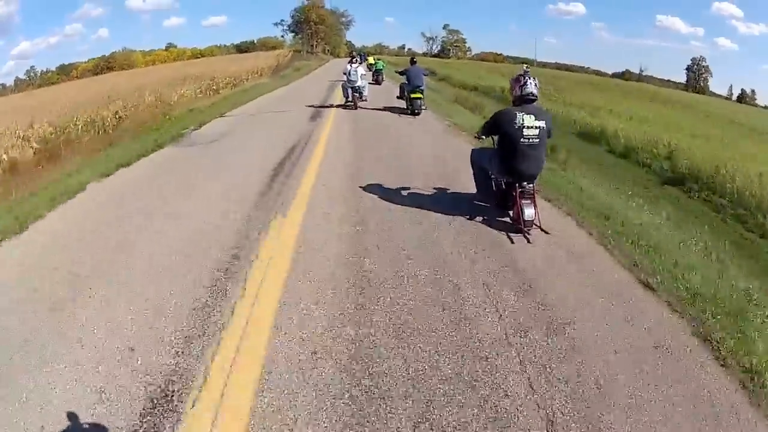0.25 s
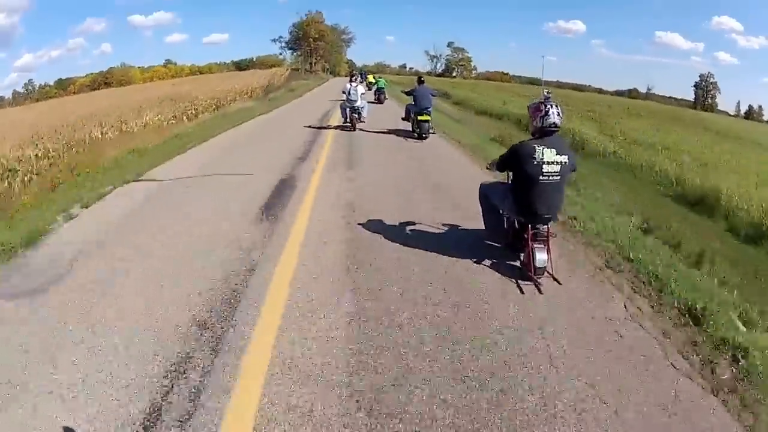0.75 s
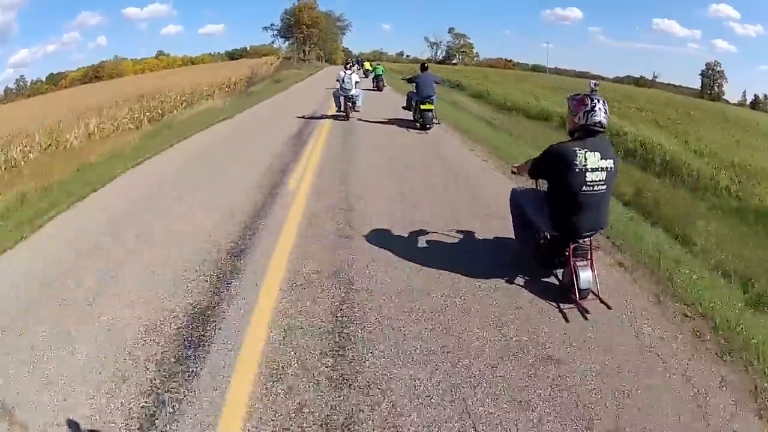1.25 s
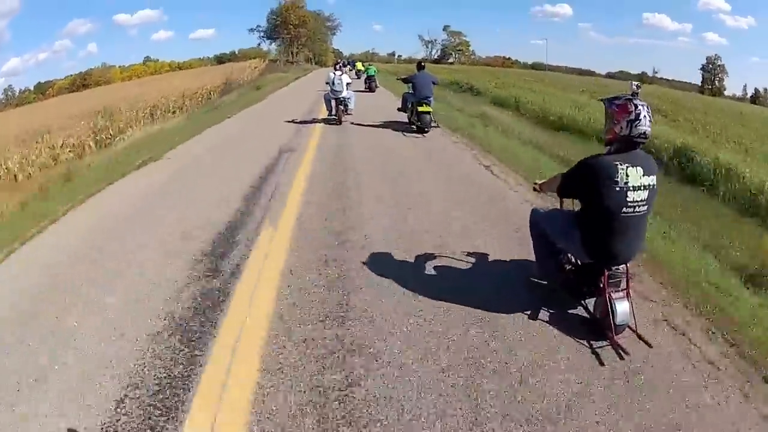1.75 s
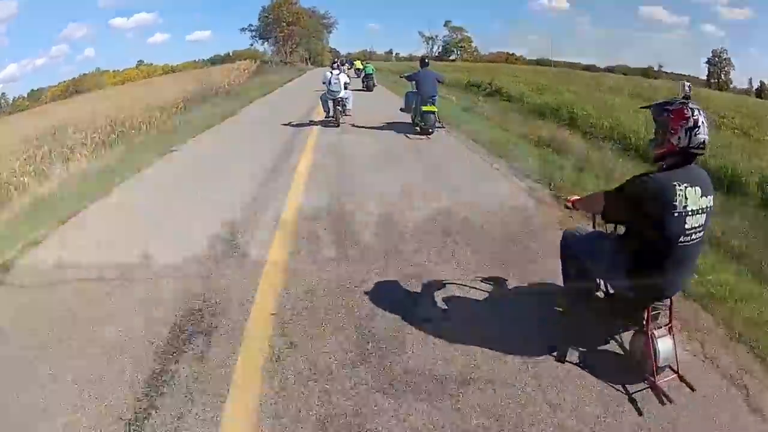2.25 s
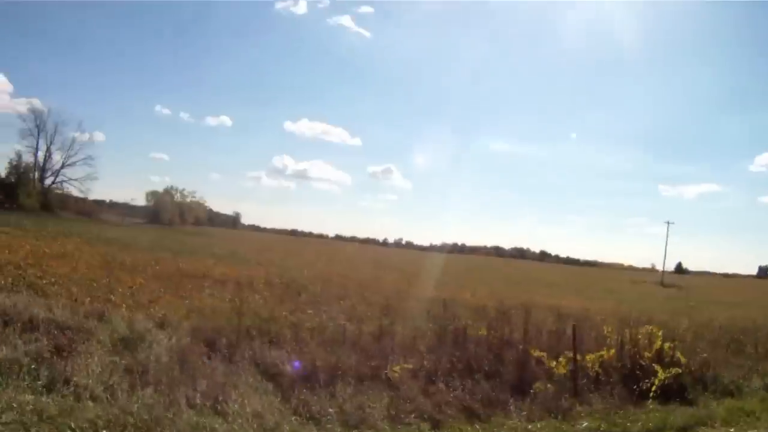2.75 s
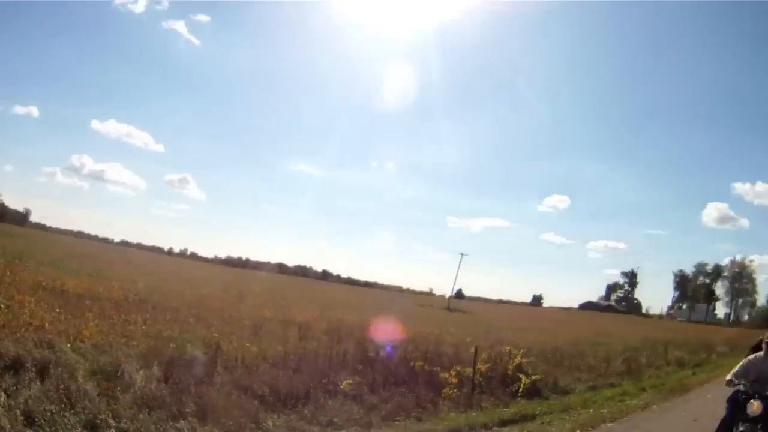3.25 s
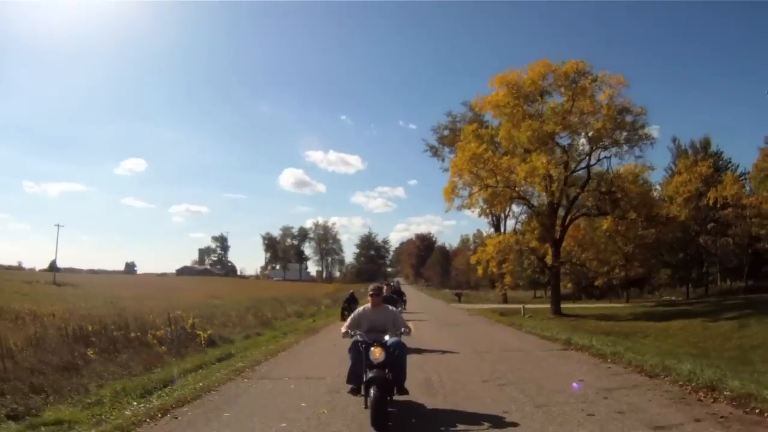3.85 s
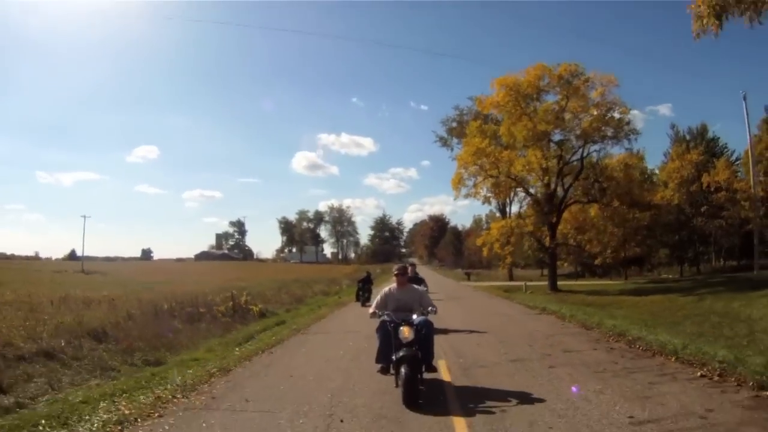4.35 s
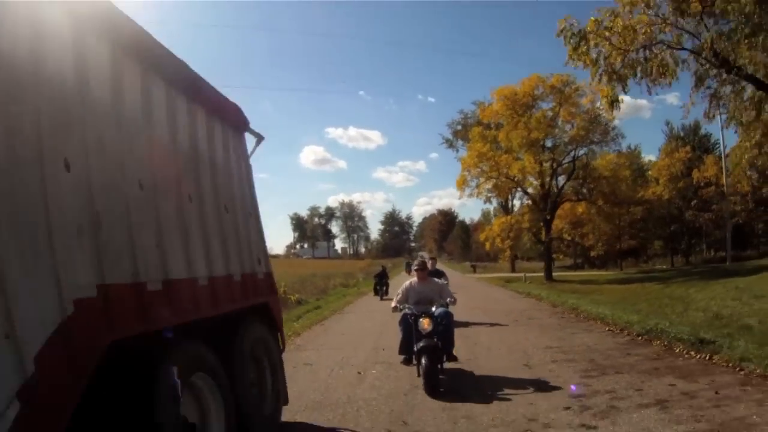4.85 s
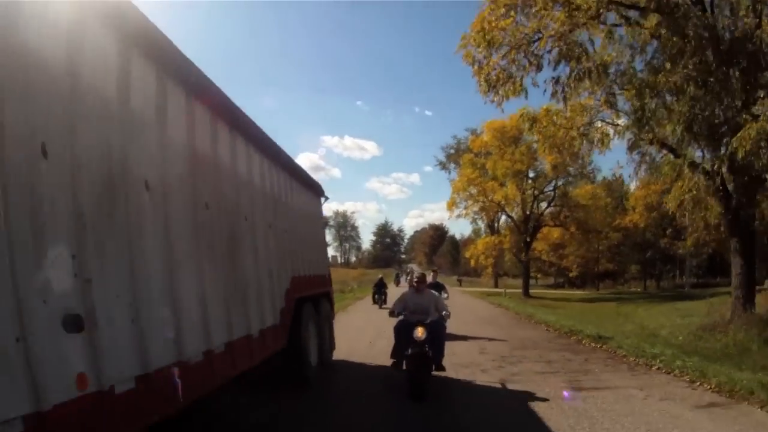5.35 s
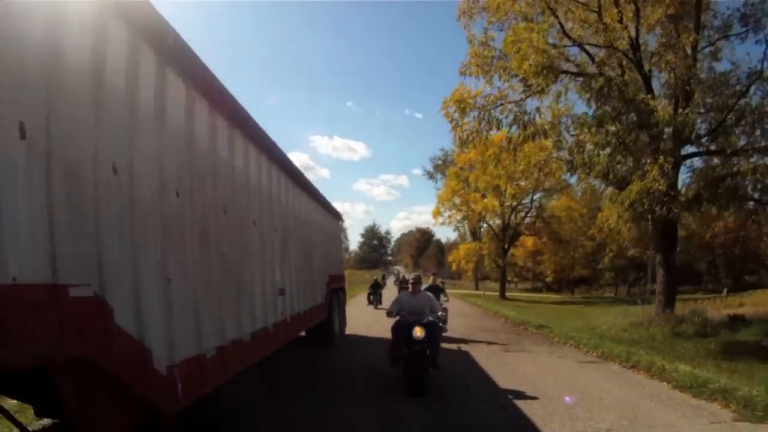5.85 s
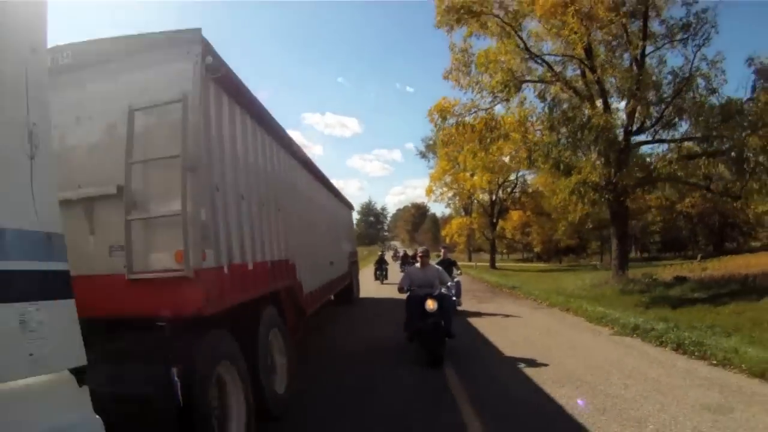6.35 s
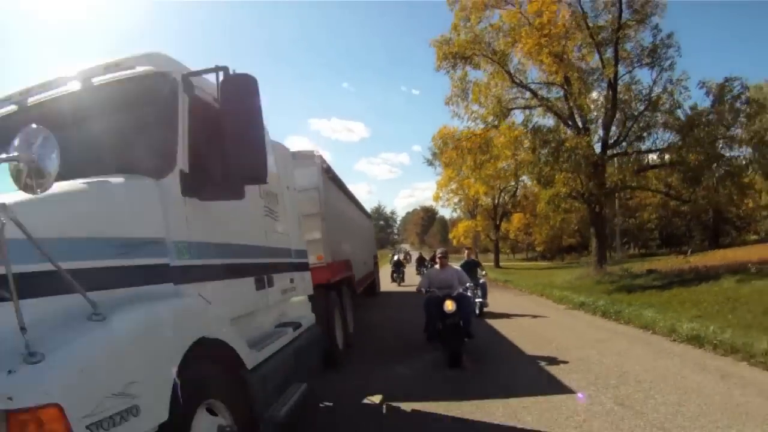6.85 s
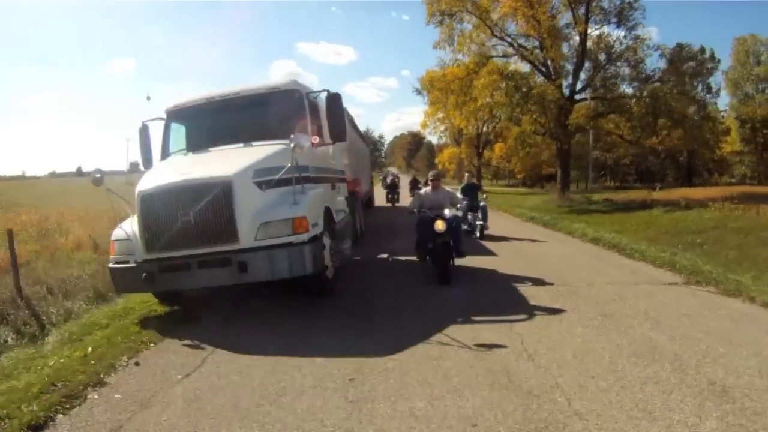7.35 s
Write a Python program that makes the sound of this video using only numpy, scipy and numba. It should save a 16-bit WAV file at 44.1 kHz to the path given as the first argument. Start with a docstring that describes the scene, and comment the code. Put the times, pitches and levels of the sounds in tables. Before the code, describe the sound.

Small motorbikes ride in a pack with pulsing exhausts, dull knocks, metal clacks and wind, and a lorry rushes past.

```python
"""A country road, heard from a camera on one of a pack of small four-stroke minibikes.
A loud bike runs just ahead, a second beside it, each firing an exhaust pulse coloured by its pipe.
That ride dissolves into a second: the camera's own bike thuds, rattles and rings its frame amid the pack.
Loose metal clacks, wind and tyres roar, a lorry passes. Bumps knock the mount and duck the gain control;
a sample-and-hold mirrors the treble."""
import sys
import numpy as np
from scipy import signal
from scipy.fft import rfft, irfft
from scipy.io import wavfile
from scipy.ndimage import uniform_filter1d
from numba import njit

SR = 44100
rng = np.random.default_rng(int(sys.argv[2]) if len(sys.argv) > 2 else 0)


def master(y):
    """Save y as 16-bit WAV."""
    cut = np.clip(np.atleast_2d(y).T, -1, 1)
    pcm = np.round(cut * 32767)  # scale
    wavfile.write(sys.argv[1], SR, pcm.astype(np.int16))


N = 334719
T = np.arange(N) / SR
DISSOLVE_S = (2.19, 2.63)


# lead engine speed (time [s], firing rate [Hz])
LEAD_RATE = [(0.0, 29.97), (0.64, 30.1), (1.07, 29.16), (1.21, 29.32), (2.21, 27.33), (2.33, 26.52),
             (2.61, 26.34)]
# lead bike level and pipe echo (time [s], level [dB], echo [share of pulse])
LEAD_LEVEL_ECHO = [(0, -3, 0.46), (.95, -9, 0.67), (1.45, -7.5, 0.089), (2.2, -9.5, 0.16)]
# exhaust response, lead and second bike (frequency [Hz], gain [dB])
LEAD_EXHAUST = [(30, -48), (80, -18), (130, -5), (190, -3), (240, 1), (290, -13.5), (360, -11),
                (440, -29.5), (600, -20.5), (790, -22.5), (900, -46.5), (1300, -46.5)]

def lead_bike():
    """Exhaust pulses echo from the pipe end; gas churns after each, the intake gulps between them."""
    times = firings(LEAD_RATE)
    bangs = pulses(np.abs(times - .0012), scatter_db=1, jitter_s=.0001)
    echo = curve(LEAD_LEVEL_ECHO, column=2) * later(bangs, .00576)
    exhaust = unit(colour(bangs + echo, LEAD_EXHAUST))
    gulps = pulses(times + .018, scatter_db=2.5, jitter_s=.0002)
    intake = undb(-12.5) * unit(ring(gulps, [(290, 25, 3), (365, 17, -3.5)]))
    flow = bangs + .87 * gulps + .16 * bursts(bangs, .019)
    silencer = undb(-18) * unit(ring(flow, [(767, 33, 19), (720, 34, 10), (519, 120, -12.5)]))
    gas = undb(-17) * unit(colour(bursts(bangs, .012), LEAD_EXHAUST))
    taps = pulses(times - .008, scatter_db=.5, jitter_s=.0024)
    valves = undb(-28.5) * unit(colour(bursts(taps, .017, rise_s=.0012), METAL_SPECTRUM))
    return undb(curve(LEAD_LEVEL_ECHO)) * (exhaust + intake + silencer + gas + valves)


# own engine speed (time [s], firing rate [Hz])
OWN_RATE = [(2.283, 22.5), (2.59, 20.62), (3.2, 22.14), (3.45, 21.77), (4.07, 22.96), (4.35, 24.03),
            (4.96, 24.23), (5.2, 24.87), (5.77, 23.55), (6.14, 24.9), (6.48, 23.73), (6.98, 24.47),
            (7.32, 27.18), (7.61, 27.4)]
# own exhaust response (frequency [Hz], gain [dB])
OWN_EXHAUST = [(30, -31), (80, -7.5), (150, 6), (220, -5), (290, -1), (380, 1.5), (500, 2.5), (590, -1),
               (720, -36.5), (950, -49.5)]
# frame and camera mount modes (frequency [Hz], width [Hz], gain [dB])
FRAME_MODES = [(392.4, 16.7, 1), (286, 46, -20), (1137, 96, -25), (2395, 10.5, -18)]
# rattle of loose parts (frequency [Hz], gain [dB])
RATTLE_SPECTRUM = [(300, -18.5), (700, 7), (950, -28), (1140, 1.5), (1350, -2.5), (1900, -5.5), (2350, 2),
                   (2700, 0.5), (3300, 1), (4200, -12), (4950, -4.5), (5700, -22.5)]
# loose plate modes (frequency [Hz], width [Hz], gain [dB])
PLATE_MODES = [(2314, 130, 16), (2580, 44, -26), (2820, 480, 1)]
# shaking spells (centre [s], half length [s], plate buzz [dB], rattle change [dB])
SHAKE_SPELLS = [(3.95, 0.23, -39, 3), (4.54, 0.076, -26, 2), (5.05, .1, -40, .5), (5.48, .08, -35.5, -1.5),
                (6.084, .08, -32, 0.5), (7.193, 0.26, -29.5, -1.5)]

def own_bike():
    """Each firing thuds and rings the frame; loose parts start to rattle just ahead of it."""
    times = firings(OWN_RATE)
    bangs = pulses(times + .0008, scatter_db=1.3, jitter_s=.00007)
    gas = undb(-13) * unit(colour(bursts(pulses(times - .003), .006), OWN_EXHAUST))
    valve_opening = .43 * later(bangs, -.0024)  # precedes the main pulse
    thud = unit(colour(bangs + valve_opening, OWN_EXHAUST)) + gas
    frame = unit(ring(bangs + .056 * bursts(bangs, .039), FRAME_MODES))
    parts = bursts(pulses(times - .0045, scatter_db=1.2, jitter_s=.0012), .008, rise_s=.004)
    valves = bursts(pulses(times + .024, scatter_db=4.5, jitter_s=.0065), .015, rise_s=.0026)
    rattle = unit(colour(parts + .28 * valves, RATTLE_SPECTRUM))
    plate_hits = pulses(times - .005, scatter_db=4)
    buzz = unit(ring(bursts(plate_hits, .0085, rise_s=.0018), PLATE_MODES))
    surge_crest_s, surge_period_s = 5.53, .521
    load = np.cos(2 * np.pi * (T - surge_crest_s) / surge_period_s) * (T > 3.8) * (T < 7.1)
    throttle_pull_db = 2 * swell(7.27, .24)
    throttle_off = ease(7.48, db_per_s=90)
    shake_db = sum(db * swell(s, half_s) for s, half_s, _, db in SHAKE_SPELLS)
    buzz_gain = sum(undb(db) * swell(s, half_s) for s, half_s, db, _ in SHAKE_SPELLS)
    return (thud * undb(-20.5 + 1.5 * load + throttle_pull_db) * throttle_off
            + frame * undb(-25 + .2 * load)
            + rattle * undb(-34 + 2 * load + shake_db)
            + buzz * buzz_gain)


# engine harmonics driving the frame (order [x firing rate], level at resonance [dB])
FRAME_HARMONICS = [(14, -20), (15, -26), (16, -30), (18, -22.5), (19, -23)]

def frame_drone():
    """A wavering, nearly pure tone: engine harmonics swell as they cross the frame's resonance."""
    resonance_hz, width_hz = 397, 26
    firing_hz = curve(OWN_RATE) * (1 + .002 * walk(11.58))
    phase = 2 * np.pi * np.cumsum(firing_hz) / SR
    tone = 0
    for order, db in FRAME_HARMONICS:
        detuning = 2 * (order * firing_hz - resonance_hz) / width_hz
        tone += undb(db) * np.sin(order * phase) / (1 + detuning ** 2)
    return np.sqrt(2) * tone * undb(walk(8.5))


# second engine speed (time [s], firing rate [Hz])
SECOND_RATE = [(1.003, 31.24), (1.27, 31.48), (1.54, 29.99), (1.81, 30.03), (2.61, 28.01)]

def second_bike():
    """A slightly faster engine opens up, then eases off; a loose part chatters once a firing."""
    start_s, open_s = .94, 1.11
    times = firings(SECOND_RATE)
    bangs = pulses(times + .00098, scatter_db=2.5, jitter_s=.00064)
    gas = undb(-6) * unit(colour(bursts(bangs, .014), LEAD_EXHAUST))
    exhaust = undb(-11) * ease(open_s, db_per_s=4) * (unit(colour(bangs, LEAD_EXHAUST)) + gas)
    strikes = pulses(times, db=-8, scatter_db=2) * ease(open_s, db_per_s=17.5)
    chatter = colour(bursts(strikes, .0034, rise_s=.00091), METAL_SPECTRUM)
    return ramp(start_s, open_s) ** 2 * (exhaust + chatter)


# road bumps (time [s], relative level [dB])
JOLTS = [(0.3014, 9), (.365, 6), (.970, 8), (2.086, -13), (5.478, -19)]
# knock of the camera mount (frequency [Hz], gain [dB])
KNOCK_SPECTRUM = [(20, -12), (70, -3.5), (200, 8.5), (500, -12.5), (900, -22), (3000, -29.5), (6000, -41)]

def bumps():
    """The road jolts the camera mount: a loud, dull knock with one harder rebound."""
    times, db = np.transpose(JOLTS)
    jolts = pulses(times, db) + pulses(times + .00304, db + 8)
    knock = undb(32) * colour(jolts, KNOCK_SPECTRUM)
    return knock + undb(9) * colour(bursts(jolts, .0031), KNOCK_SPECTRUM)


# single metal strikes (time [s], relative level [dB])
METAL_STRIKES = [(0.2085, -8), (0.4559, -12), (1.483, -8), (1.883, -9.5), (1.917, -6), (2.153, -6),
                 (2.2222, -8.5), (2.3962, -16), (5.4342, -11), (5.5367, -10.5), (6.0222, -11), (6.916, -14),
                 (6.966, -15)]
# struck metal, also lead valves and chatter (frequency [Hz], gain [dB])
METAL_SPECTRUM = [(200, -38), (750, 8), (1150, -3), (1600, 0), (2350, 7), (2800, 7), (3400, 7),
                  (4300, -1.5), (5000, -4), (5800, -6)]
# regular ticking (time [s], tick rate [Hz])
TICK_RATE = [(6.7605, 19.35), (7.25, 19.3)]

def clacks():
    """Loose metal strikes: single hard clacks, and a thin regular tick near the end."""
    times, db = np.transpose(METAL_STRIKES)
    strikes = colour(bursts(pulses(times + .001, db), .002, rise_s=.0007), METAL_SPECTRUM)
    ticks = bursts(pulses(firings(TICK_RATE), scatter_db=1.5), .002, rise_s=.0008)
    return undb(1) * strikes + undb(-2.5) * ring(ticks, [(4850, 240, 1.8), (2930, 300, .21)])


# distant engines (start firing rate [Hz], end firing rate [Hz], relative level [dB])
PACK_ENGINES = [(17.596, 21.4, -4.5), (24.19, 30.5, -11.5), (27.93, 23.1, -2), (33.04, 32, -12)]
# their exhaust response (frequency [Hz], gain [dB])
PACK_EXHAUST = [(30, -21), (70, -10), (115, -1), (165, -1), (220, -4), (268, -1.5), (330, -7), (480, -14),
                (600, -19), (850, -33)]
# nearness of the pack (time [s], level [dB])
PACK_NEARNESS = [(2.2, -16), (2.6, -19), (6.85, -18.5), (7.25, -24.5)]

def pack():
    """Four bikes further off, each wandering in speed; road and verge reflect every pulse."""
    bangs = 0
    for start_hz, end_hz, db in PACK_ENGINES:
        firing_hz = np.linspace(start_hz, end_hz, N) * (1 + .008 * walk(1.2))
        times = firings(np.column_stack([T, firing_hz])) + rng.random() / start_hz
        bangs += pulses(times, db, scatter_db=1.8, jitter_s=.0001)
    arrivals = bangs + .5 * later(bangs, .0066) + .5 * later(bangs, .0107) + .3 * later(bangs, .0152)
    gas = undb(-6) * unit(colour(bursts(arrivals, .008), PACK_EXHAUST))
    return undb(curve(PACK_NEARNESS)) * (unit(colour(arrivals, PACK_EXHAUST)) + gas)


def lorry(passing):
    """An oncoming lorry: its tyres swell past and its wake thumps the housing."""
    tyre_spectrum = [(100, -9), (350, -.5), (560, 4.5), (750, -11), (1200, -18)]
    tyres = unit(colour(rng.standard_normal(N), tyre_spectrum))
    wake = unit(ring(rng.standard_normal(N), [(55, 40, 0)]))
    return undb(-29.5) * tyres * passing + undb(-22) * wake * swell(6.8, .039)


# wind and tyre noise (frequency [Hz], gain [dB])
ROAR_SPECTRUM = [(20, -1), (60, 1), (150, -2), (350, -12), (750, -15), (950, -22), (1600, -19), (2800, -17),
                 (3800, -21), (5500, -30)]

def road_roar(lorry_passing):
    """Wind on the housing and tyre roar, fluttering, louder as the lorry passes."""
    ride_db = np.interp(T, DISSOLVE_S, [-29, -32])
    roar = unit(colour(rng.standard_normal(N), ROAR_SPECTRUM))
    return roar * undb(ride_db + 3 * lorry_passing + 2 * walk(12))


def firings(speed):
    """Times [s] at which an engine completes a cycle."""
    times, hz = np.transpose(speed)
    t = np.arange(times[0], times[-1], 1 / SR)
    cycles = np.cumsum(np.interp(t, times, hz)) / SR
    return np.interp(np.arange(int(cycles[-1]) + 1), cycles, t)


def pulses(times, db=0, scatter_db=0, jitter_s=0):
    """An impulse at each time, with optional scatter in size and timing."""
    chance = rng.standard_normal((len(times), 2))
    at = np.round((times + jitter_s * chance[:, 0]) * SR).astype(int)
    inside = (at >= 0) & (at < N)
    return np.bincount(at[inside], undb(db + scatter_db * chance[:, 1])[inside], N)


def bursts(train, decay_s, rise_s=.00017):
    """Each impulse starts a noise burst that swells and dies."""
    envelope = signal.lfilter([1], [1, -np.exp(-1 / (decay_s * SR))], train)
    rise = 1 - np.exp(-1 / (rise_s * SR))
    return signal.lfilter([rise], [1, rise - 1], envelope) * rng.standard_normal(N)


def colour(x, points):
    """Minimum-phase filter through (frequency [Hz], gain [dB]) points, then -18 dB per octave."""
    hz, db = np.transpose(points)
    size = 8192
    f = np.arange(size // 2 + 1) * SR / size + 1
    gain_db = np.interp(np.log(f), np.log(hz), db) - 18 * np.log2(np.maximum(f / hz[-1], 1))
    cepstrum = irfft(np.log(undb(gain_db)))[:size // 2]
    cepstrum[1:] *= 2
    response = irfft(np.exp(rfft(cepstrum, size)))
    return signal.fftconvolve(x, response)[:N]


def ring(x, modes):
    """Sum of resonances (frequency [Hz], width [Hz], gain [dB]), skirts cut an octave away."""
    out = 0
    for hz, width_hz, db in modes:
        skirts = signal.butter(2, [hz / 2, min(hz * 2, SR / 3)], "band", fs=SR, output="sos")
        resonance = signal.lfilter(*signal.iirpeak(hz, hz / width_hz, fs=SR), x)
        out += undb(db) * signal.sosfilt(skirts, resonance)
    return out


def lowpass(x, hz):
    """Steep elliptic low-pass."""
    return signal.sosfilt(signal.ellip(8, .2, 70, hz, fs=SR, output="sos"), x)


def later(x, delay_s):
    """Delay; a negative value advances."""
    return np.interp(T - delay_s, T, x, left=0)


def undb(db):
    """Decibels to gain."""
    return 10 ** (np.asarray(db) / 20)


def unit(x):
    """Scale to rms 1 while sounding."""
    power = uniform_filter1d(x ** 2, SR // 10)
    return x / np.sqrt(power[power > power.max() / 1000].mean())


def curve(table, column=1):
    """One table column, linearly interpolated over time."""
    rows = np.array(table)
    return np.interp(T, rows[:, 0], rows[:, column])


def walk(rate_hz):
    """Slow random drift, spread near 1."""
    knots = rng.standard_normal(1000)
    return np.interp(T * rate_hz, np.arange(len(knots)), knots)


def ramp(start_s, end_s):
    """Linear rise from 0 to 1."""
    return np.clip((T - start_s) / (end_s - start_s), 0, 1)


def swell(centre_s, half_length_s):
    """Bell-shaped rise and fall."""
    return np.exp(-((T - centre_s) / half_length_s) ** 2)


def ease(from_s, db_per_s):
    """Full level, then a steady fall."""
    return undb(-db_per_s * np.maximum(T - from_s, 0))


@njit
def follow(x, attack_s, release_s):
    """Peak follower."""
    out, peak = np.empty(len(x)), 0.
    for i in range(len(x)):
        lag_s = attack_s if abs(x[i]) > peak else release_s
        peak += (abs(x[i]) - peak) / (lag_s * SR)
        out[i] = peak
    return out


def scene():
    """The ride behind the loud bike dissolves into the ride amid the pack."""
    dissolve = ramp(*DISSOLVE_S)
    lorry_passing = swell(6.04, .99)
    near_bikes = (1 - dissolve) * (lead_bike() + second_bike()) + dissolve * (own_bike() + frame_drone())
    return (near_bikes + pack() + clacks() + bumps() + road_roar(lorry_passing) + lorry(lorry_passing))[None]


def record(dry):
    """Gain control ducks on overloads, peaks round off, held samples mirror the sound about the hold rate."""
    threshold, ceiling, hold_hz = .89, .97, 12000
    peak = follow(dry[0], attack_s=.00097, release_s=.075)
    ducked = dry[0] / np.maximum(peak / threshold, 1)
    rounded = ducked / (1 + (ducked / ceiling) ** 6) ** (1 / 6)
    samples = signal.resample(lowpass(rounded, hz=5700), round(N * hold_hz / SR))
    held = signal.resample(np.repeat(samples, 8), N)
    return lowpass(held, hz=15500)[None]


dry = scene()
out = record(dry)
master(out)
```